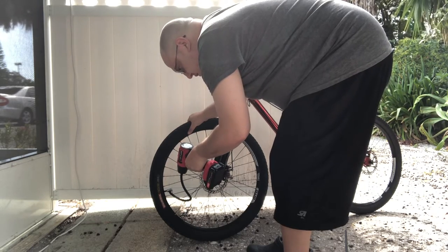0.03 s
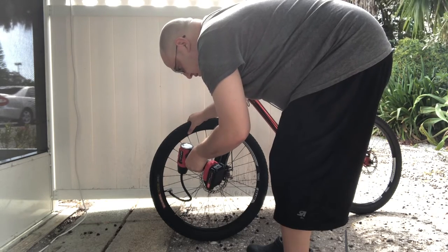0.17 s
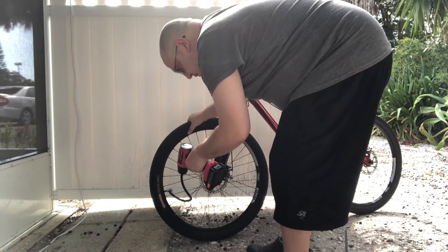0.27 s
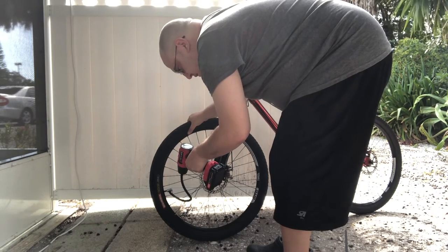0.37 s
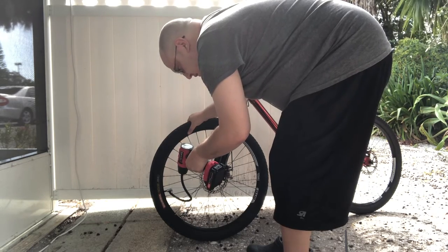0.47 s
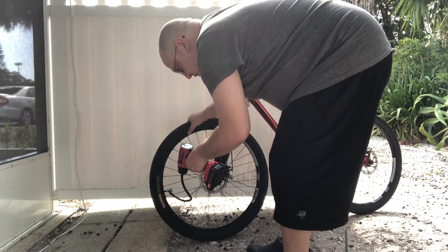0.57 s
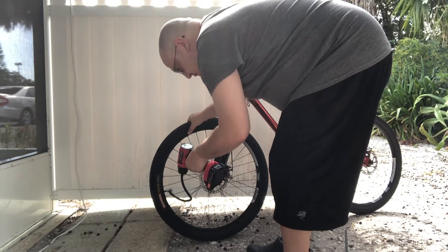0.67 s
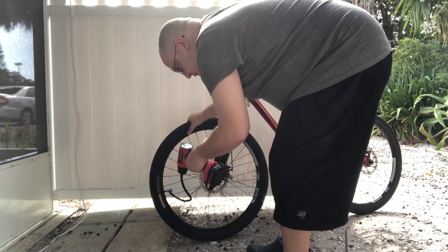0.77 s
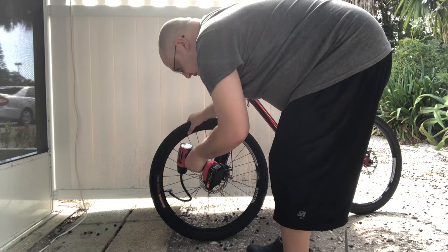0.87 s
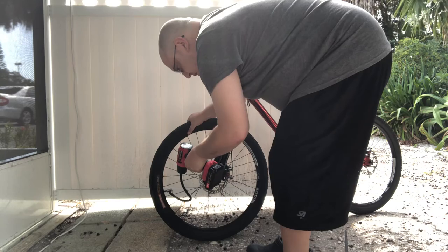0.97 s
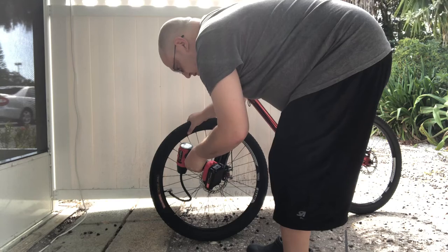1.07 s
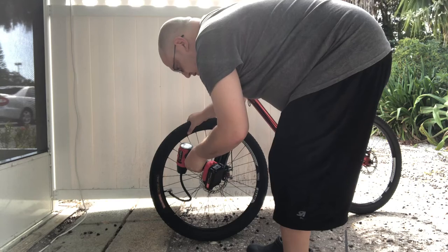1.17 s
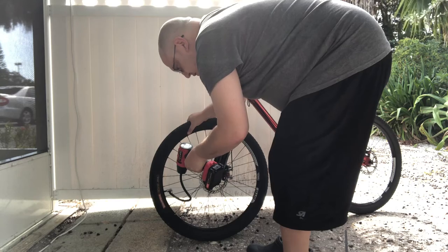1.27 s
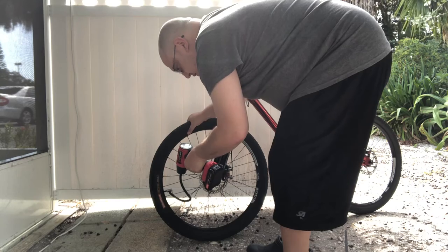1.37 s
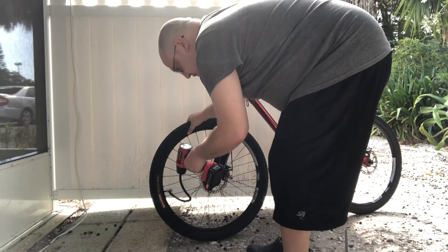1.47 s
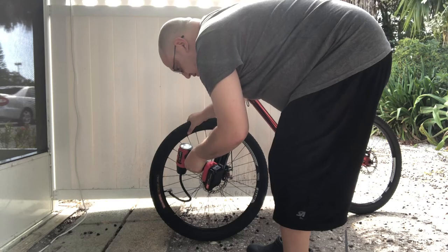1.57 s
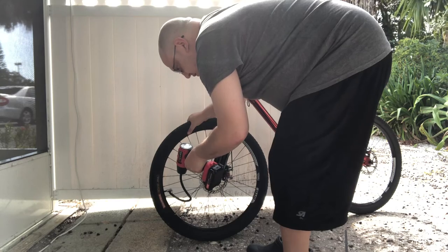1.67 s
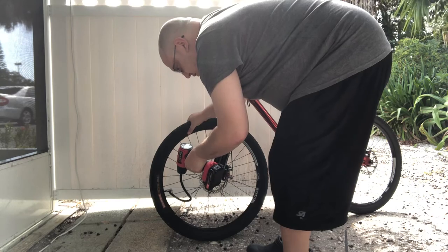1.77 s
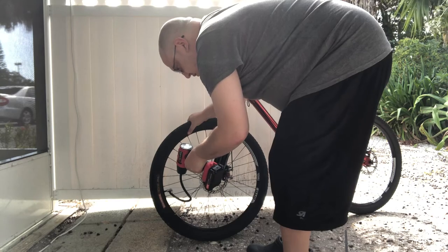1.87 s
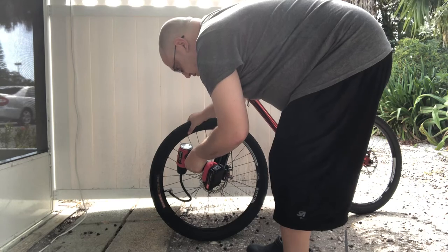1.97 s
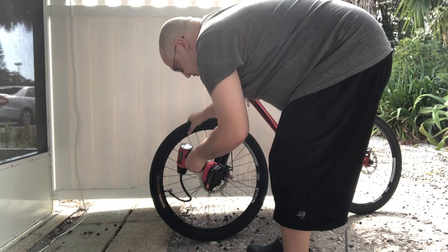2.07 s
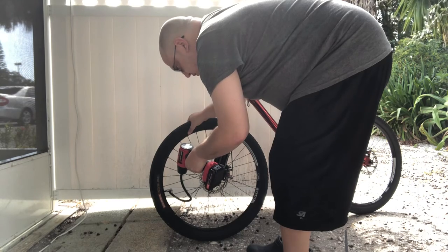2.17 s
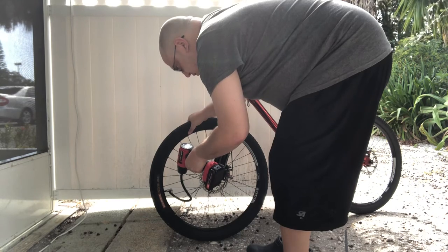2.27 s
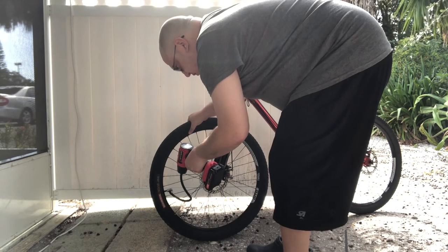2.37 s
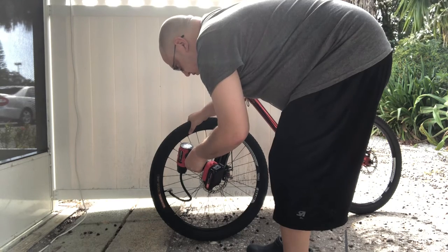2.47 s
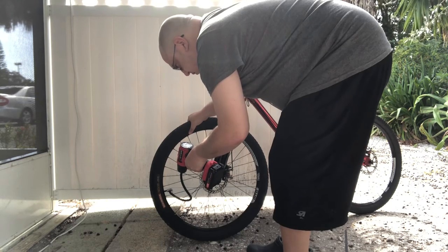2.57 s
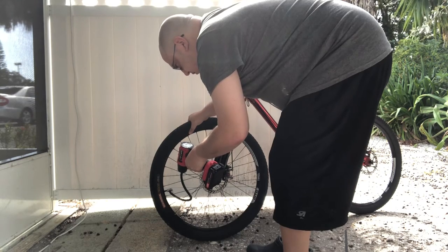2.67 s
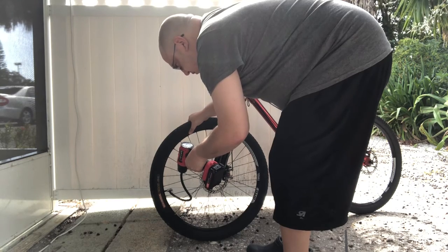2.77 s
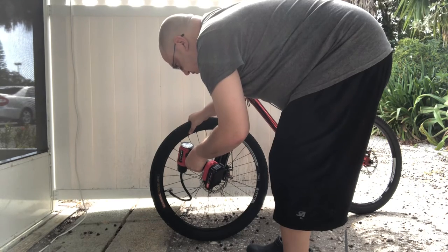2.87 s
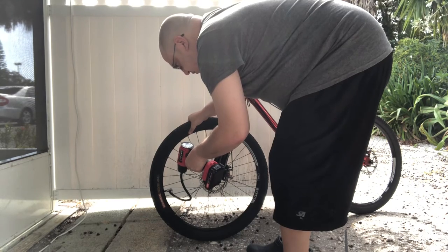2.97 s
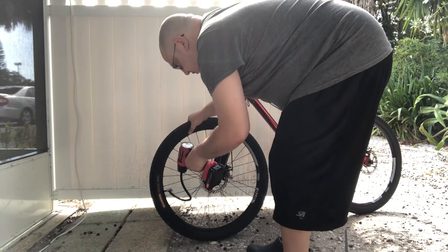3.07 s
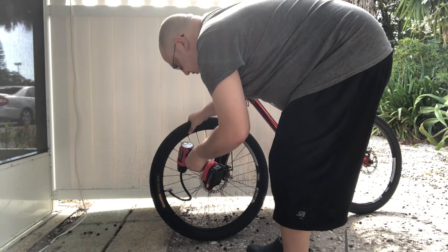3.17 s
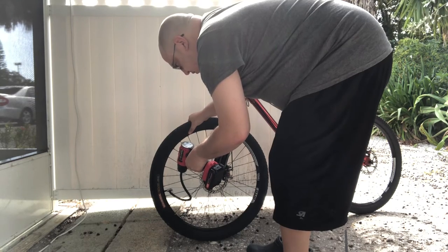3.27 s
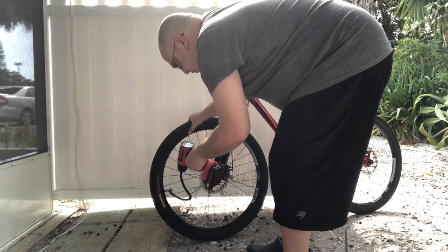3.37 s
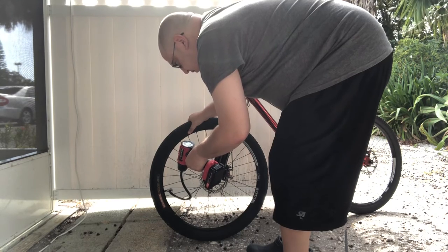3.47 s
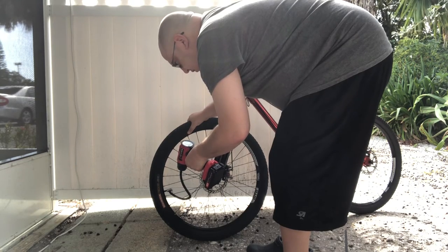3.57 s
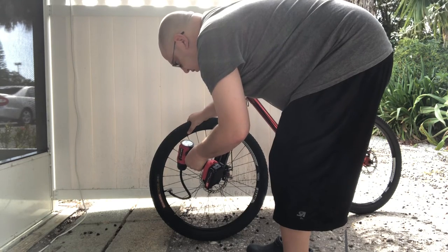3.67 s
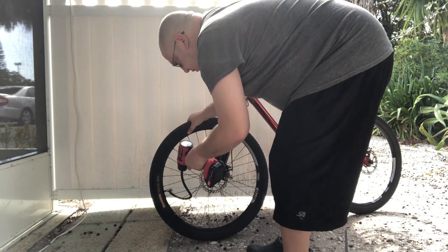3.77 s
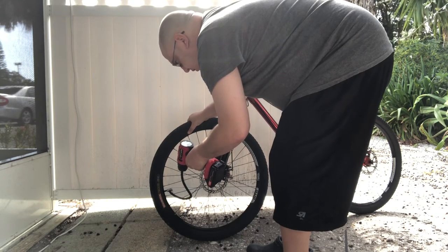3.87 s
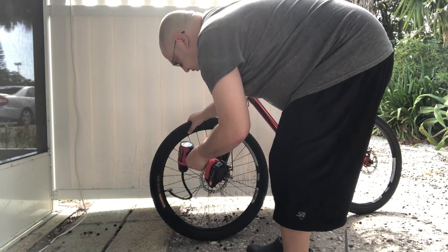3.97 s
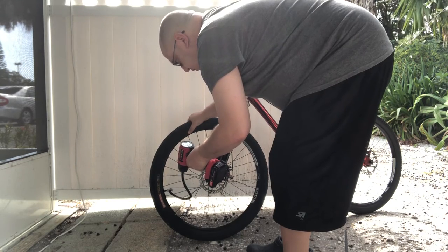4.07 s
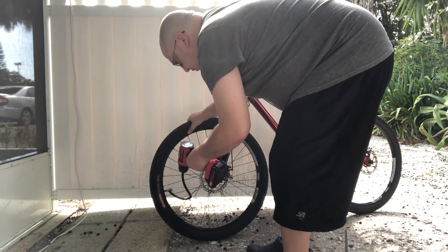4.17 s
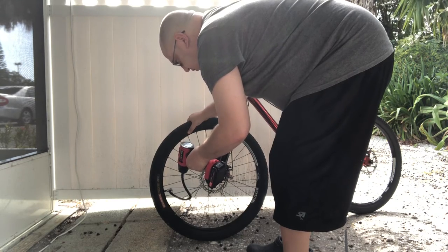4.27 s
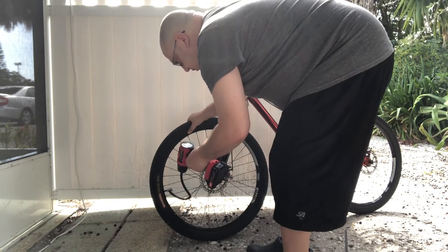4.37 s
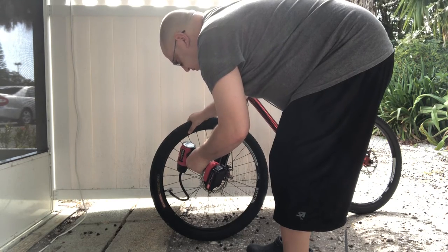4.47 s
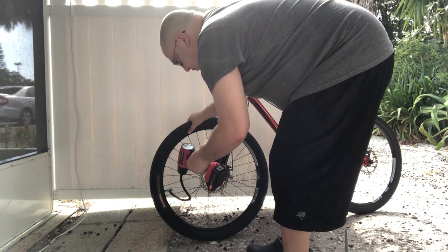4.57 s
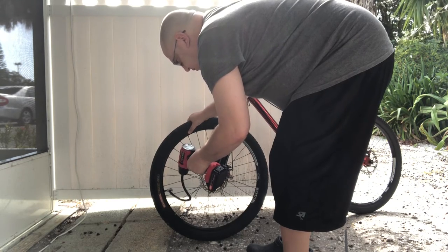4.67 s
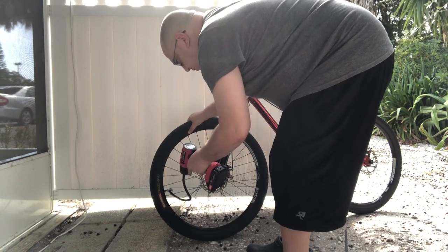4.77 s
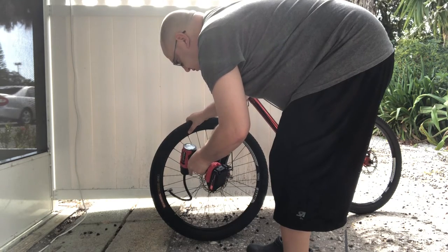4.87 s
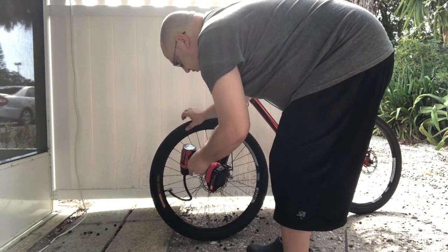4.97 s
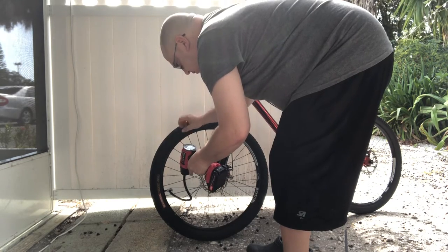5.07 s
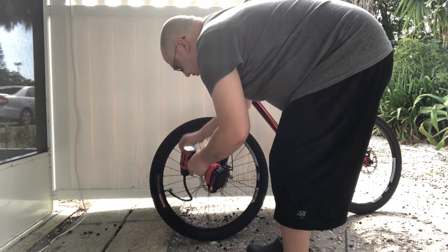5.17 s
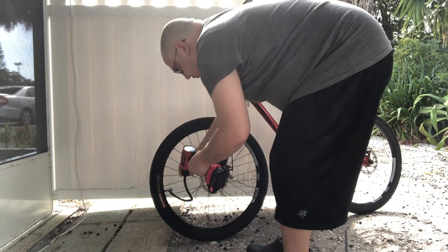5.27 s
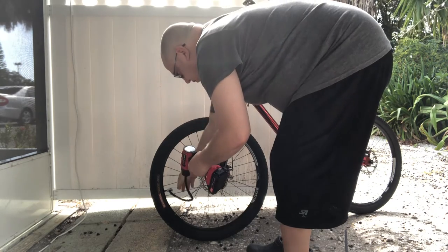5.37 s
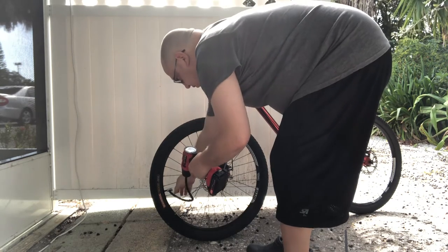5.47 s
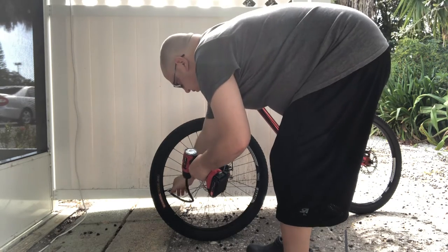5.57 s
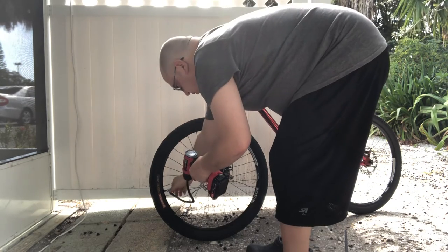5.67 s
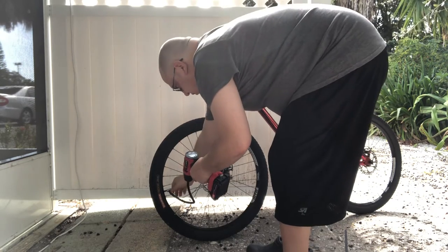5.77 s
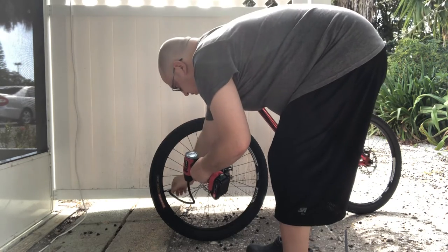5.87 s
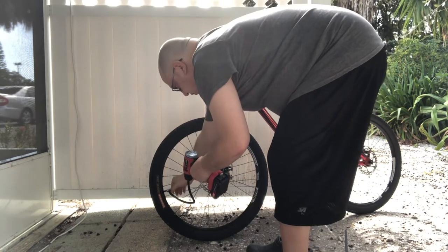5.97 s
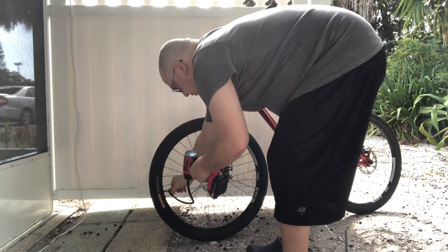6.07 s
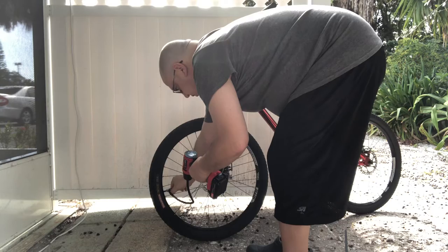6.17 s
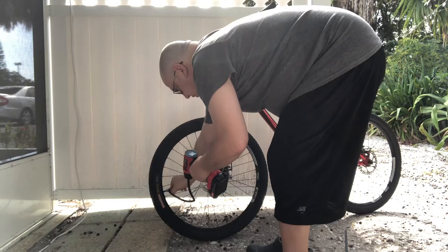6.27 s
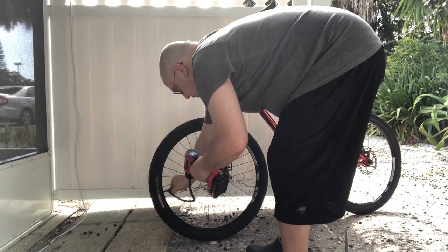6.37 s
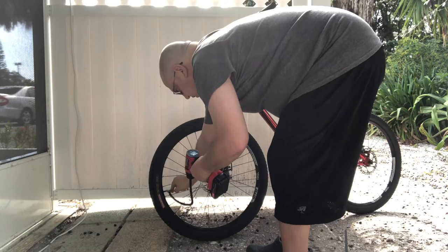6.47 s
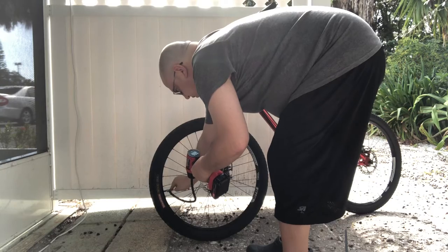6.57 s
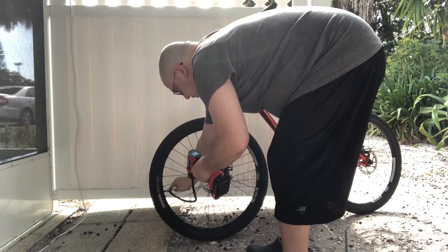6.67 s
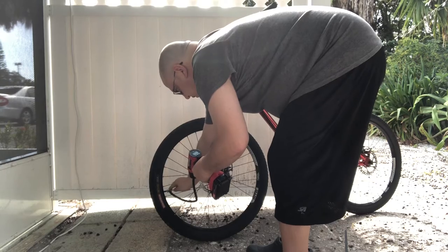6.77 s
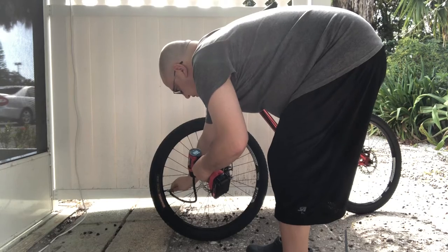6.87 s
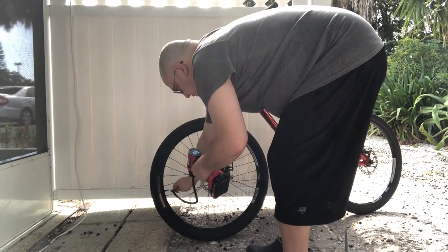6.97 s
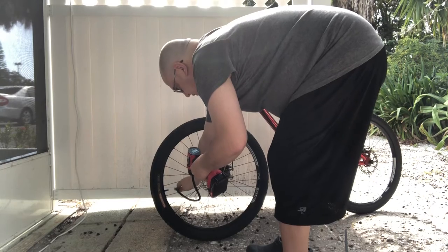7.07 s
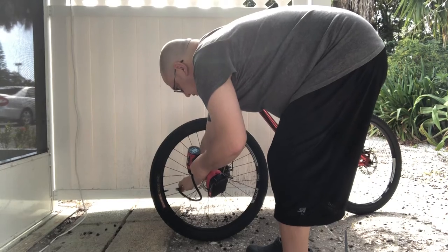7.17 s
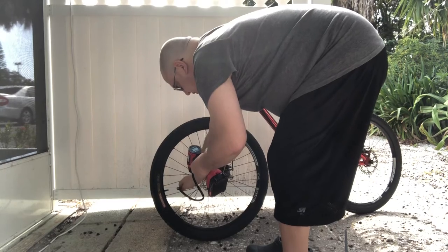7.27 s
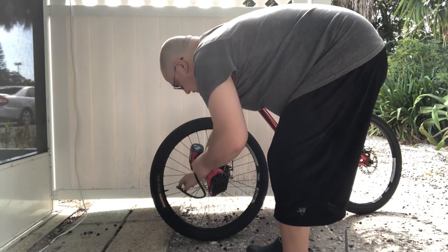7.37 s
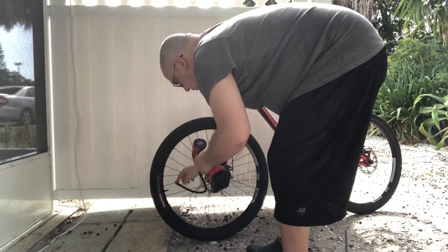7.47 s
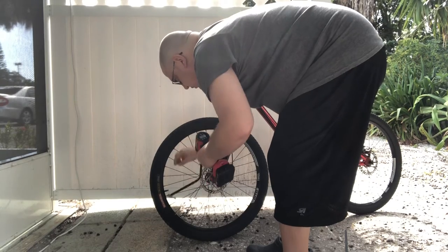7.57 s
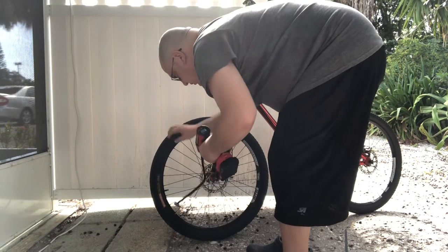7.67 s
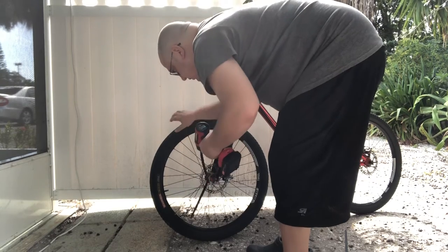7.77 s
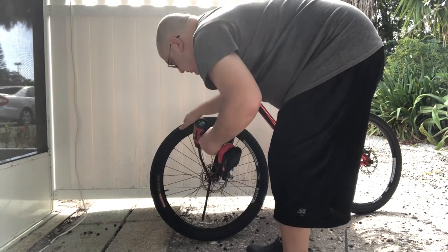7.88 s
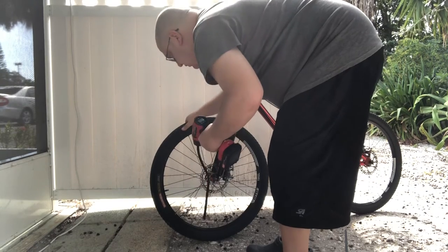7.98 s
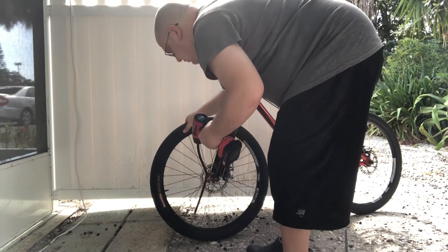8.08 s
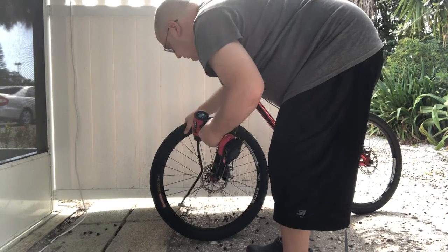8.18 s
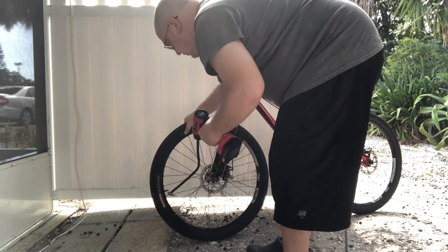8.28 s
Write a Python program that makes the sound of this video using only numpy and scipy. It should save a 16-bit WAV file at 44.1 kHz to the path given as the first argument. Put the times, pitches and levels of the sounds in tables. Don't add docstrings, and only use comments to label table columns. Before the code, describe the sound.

A small electric piston pump runs from the start, a fast buzzing clatter with gear grind and metallic ring. It turns harder and brighter as the tyre firms, then quickly coasts to a stop with light clicks. Over faint distant traffic, a short high hiss of air bursts with a squeal, then a lever clacks. Recorded by a phone about two metres away on a walled patio.

```python
import sys
import numpy as np
from scipy import signal
from scipy.fft import rfft, irfft, next_fast_len
from scipy.io import wavfile
from scipy.ndimage import uniform_filter1d

SR = 44100
rng = np.random.default_rng(int(sys.argv[2]) if len(sys.argv) > 2 else 0)


def undo_db(level):
    steps = np.asarray(level, float) / 20
    return 10 ** steps


def store_pcm(level_fs):
    pcm = np.round(np.clip(level_fs, -1, 1) * 32767).astype(np.int16)
    wavfile.write(sys.argv[1], SR, np.atleast_2d(pcm).T)


N = 367774

BODY_DB, FIRM_BODY_DB = -35, 0.58
FIRM_S, FIRM_RISE_S = 3.42, 0.12
OFF_S, FADE_LAG_S = 4.42, 0.012
BODY_FADE_DB_S, RATTLE_FADE_DB_S, GRIND_FADE_DB_S = 185, 250, 132


def pump():
    coasting_s = np.clip(clock() - OFF_S, 0, None)
    turns = crank(coasting_s)
    coasting_s = np.clip(coasting_s - FADE_LAG_S, 0, None)
    firm = .5 + .5 * np.tanh((clock() - FIRM_S) / FIRM_RISE_S)
    shaking = shakes(turns, KNOCKS, rest_db=-10, scatter_db=1.3)
    strokes = cylinder(turns, firm, coasting_s)
    gearing = undo_db(-GRIND_FADE_DB_S * coasting_s) * gear_train(turns, shaking, firm)
    light = reed(turns, firm) + rattle(turns, shaking, firm)
    light = patio(undo_db(-RATTLE_FADE_DB_S * coasting_s) * light)
    return undo_db(BODY_DB + FIRM_BODY_DB * firm) * (undo_db(-BODY_FADE_DB_S * coasting_s) * strokes + gearing + light)


CRANK_START = -.0888
TURN_HZ = 32.85
START_TURNS_S, SAG_TURNS_S2, BRAKE_TURNS_S2 = 33.02, .0834, 105


def crank(coasting_s):
    speed = START_TURNS_S - SAG_TURNS_S2 * clock() - BRAKE_TURNS_S2 * coasting_s
    return CRANK_START + np.cumsum(np.clip(speed, 0, None)) / SR


VALVE_DB, FIRM_VALVE_DB = -4.5, 1.5


def cylinder(turns, firm, coasting_s):
    thrum = stroke(turns, 0, 500, scatter_db=.8, wobble_s=3e-5, smear=.2)
    pop = stroke(turns, 500, 800, scatter_db=.9, wobble_s=2.5e-5, smear=.17)
    snap = stroke(turns, 800, 1150, scatter_db=1.3, wobble_s=2.5e-5, smear=.11)
    valve = stroke(turns, 1150, 1600, scatter_db=1.1, wobble_s=3e-5, smear=.1)
    valve_db = VALVE_DB + FIRM_VALVE_DB * firm - RATTLE_FADE_DB_S * coasting_s / 2
    return undo_db(-9.5) * thrum + undo_db(-5.5) * pop + undo_db(-3.0) * snap + undo_db(valve_db) * valve


# (pitch [Hz], width [Hz], level [dB])
STROKE = [(237, 19, -3), (330, 15, -5), (380, 54, -6), (465, 75, -11), (591, 81, -3), (736, 83, -2),
          (903, 42, 0), (974, 111, 0), (1085, 59, -9), (1230, 175, -4), (1419, 114, -6), (1564, 34, -3)]
# (pitch [Hz], place after the slap [turns])
STROKE_WHEN = [(200, 0.4462), (450, 0.338), (600, 0.282), (1000, 0.269), (1120, 0.0072), (1300, -0.139),
               (1450, -0.248), (1600, 0.18)]


def stroke(turns, lo_hz, hi_hz, scatter_db, wobble_s, smear):
    order = np.arange(1, 49)
    order_hz = order * TURN_HZ
    power = 0
    for hz, width, db in STROKE:
        power = power + (undo_db(db) / (1 + (2 * (order_hz - hz) / width) ** 2)) ** 2
    gain = np.sqrt(power)
    delay = np.cumsum(np.interp(order_hz, *np.transpose(STROKE_WHEN)))
    delay = delay + smear * rng.standard_normal(len(order))
    angle = np.arange(-SR // TURN_HZ, SR // TURN_HZ) * TURN_HZ / SR
    use = (order_hz >= lo_hz) & (order_hz < hi_hz)
    waves = np.cos(2 * np.pi * (order[use, None] * (angle + .15) - delay[use, None]))
    shape = gain[use] @ waves * np.hanning(len(angle))
    return level(signal.fftconvolve(ticks(turns, .15, scatter_db, wobble_s), shape, "same"), 0)


def ticks(turns, at, scatter_db, wobble_s):
    whole = np.arange(int(turns[-1] - at))
    late, size = rng.standard_normal((len(whole), 2)).T
    place = np.interp(whole + at, turns, np.arange(N)) + wobble_s * SR * late
    index = np.round(place).astype(int)[:, None] + np.arange(-8, 9)
    click = np.sinc(index - place[:, None]) * np.hanning(19)[1:-1]
    out = np.zeros(N)
    np.add.at(out, np.clip(index, 0, N - 1), undo_db(scatter_db * size)[:, None] * click)
    return out


REED_DB, FIRM_REED_DB = -6.5, 9
# (pitch [Hz], width [Hz], level [dB])
REED = [(2463, 110, 4.5), (1360, 120, -4), (3950, 114, -2.5), (5700, 320, -33)]


def reed(turns, firm):
    second = -.17 + 9 * TURN_HZ / 2440
    blows = ticks(turns, -.17, 2, 2e-5) + ticks(turns, second, 2, 2e-5)
    tones = 0
    for hz, width, db in REED:
        tones = tones + ring(ring(blows, [(hz, width, db)]), [(hz, 3.5 * width, 0)])
    return undo_db(REED_DB + FIRM_REED_DB * firm) * level(tones, -2.7)


# (time after the slap [turns], level [dB], decay [turns])
KNOCKS = [
    (-.24, -9, 0.051),
    (-.13, -3, 0.22),
    (-.02, -11, 0.15),
    (.14, -14.5, 0.084),
    (.3, -13, 0.11),
]


def shakes(turns, knocks, rest_db, scatter_db):
    out = undo_db(rest_db)
    for at, db, decay in knocks:
        size = undo_db(db + scatter_db * rng.standard_normal(200))
        since = turns - at
        out = out + size[np.floor(since).astype(int)] * np.exp(-(since % 1) / decay)
    return out


RATTLE_DB, FIRM_RATTLE_DB, FIRM_SHELL_DB = -0.7, -0.37, -2
# (pitch [Hz], level [dB per Hz])
RATTLE = [(820, -32), (1400, -3), (2000, -7), (3560, -5.5), (4270, -10), (5130, -12), (6090, -18),
          (6950, -18), (12300, -23.5), (14100, -40.5), (15800, -24)]
# (pitch [Hz], width [Hz], level [dB])
SHELL = [(1795, 98, 2), (2460, 1400, -3.5), (3500, 180, 2), (4000, 130, -5), (5110, 270, -2),
         (5650, 160, -10.5), (6950, 580, -1), (8070, 130, 3.5), (10430, 140, 4), (11380, 200, 3)]
# (pitch [Hz], width [Hz], level [dB])
FIRM_SHELL = [(4080, 67, -13), (5640, 150, -1), (1470, 170, -14)]
# (time after the slap [turns], level [dB], decay [turns])
BRUSH_KNOCKS = [
    (-.27, 0, .07),
    (-.05, -5, .1),
    (.29, 1, .11),
]
# (pitch [Hz], width [Hz], level [dB])
BRUSH = [(14130, 1100, 9), (14500, 1200, -16)]


def rattle(turns, shaking, firm):
    clatter = tooth_clatter(turns, uniform_filter1d(shaking, size=50), repeat=0.44, drift_hz=0.43)
    shake = colour(clatter, RATTLE)
    shell = shake + undo_db(FIRM_SHELL_DB * firm) * ring(shake, SHELL) + firm * ring(shake, FIRM_SHELL)
    sparking = shakes(turns, BRUSH_KNOCKS, rest_db=-3, scatter_db=1.5)
    brush = level(ring(sparking * rng.standard_normal(N), BRUSH), -10)
    return undo_db(RATTLE_DB + FIRM_RATTLE_DB * firm) * (level(shell, 2.02) + brush)


def tooth_clatter(turns, shaking, repeat, drift_hz):
    size = int(SR / TURN_HZ)
    worn = rng.standard_normal((2, size))[:, (turns % 1 * size).astype(int)]
    drift = np.cumsum(drift_hz * (1 + .5 * walk(1.97))) * 2 * np.pi / SR
    same = worn[0] * np.cos(drift) + worn[1] * np.sin(drift)
    teeth = np.sqrt(repeat) * same + np.sqrt(1 - repeat) * rng.standard_normal(N)
    return signal.sosfilt(signal.butter(4, 1550, "high", fs=SR, output="sos"), shaking * teeth)


FIRM_GRIND_DB, FIRM_MESH_DB = 3, -0.5
# (pitch [Hz], level [dB per Hz])
GRIND = [(160, -46), (280, -16), (329, -5), (505, -14), (589, -5), (728, -5), (818, -9), (967, -2),
         (1600, -9), (2080, -39), (3520, -120)]


def gear_train(turns, shaking, firm):
    even = np.sqrt(shaking)
    grind = level(colour(even * rng.standard_normal(N), GRIND), -10.5)
    case = mesh(turns, even, repeat=.45)
    return undo_db(FIRM_GRIND_DB * firm) * grind + undo_db(FIRM_MESH_DB * firm) * case


PINION_TEETH, WHEEL_TEETH, MESH_DB = 8, 39, -7
# (pitch [Hz], width [Hz], level [dB])
MESH = [(951, 147, 5.5), (635, 110, -5.5), (450, 220, -9)]
# (multiple of the shaft rate, level [dB], lurch once a crank turn [radians])
MOTOR = [(3, -22, 0.66), (6, -30.5, 0.61)]


def mesh(turns, shaking, repeat):
    size = int(SR / TURN_HZ)
    worn = rng.standard_normal(size * PINION_TEETH)[(turns % PINION_TEETH * size).astype(int)]
    teeth = np.sqrt(repeat) * worn + np.sqrt(1 - repeat) * rng.standard_normal(N)
    shaft = turns * WHEEL_TEETH / PINION_TEETH
    hum = 0
    for multiple, db, lurch in MOTOR:
        hum = hum + undo_db(db) * np.sin(2 * np.pi * multiple * shaft + lurch * np.cos(2 * np.pi * turns))
    return level(ring(ring(shaking * teeth, MESH), MESH), MESH_DB) + hum


PUFF_S, PUFF_DB, PUFF_ATTACK_S, PUFF_HOLD_S = 6.427, -41.5, 0.0046, 0.027
LEAK_S, LEAK_DB = .012, -22
GUSH_T60_S, SEEP_DB, SEEP_T60_S = .06, -4, .36
LOW_HISS_LAG_S, LOW_HISS_DB, LOW_SEEP_DB = 0.0072, -3.5, -5.5
# (pitch [Hz], level [dB per Hz])
PUFF_COLOUR = [(3820, -43), (6500, -16), (8840, -8), (9730, -8), (10400, -4), (11600, -3), (12900, -1),
               (15100, 0), (15600, -7)]
# (time [s], pitch [Hz], level [dB], hold [s], time to fade by 60 dB [s])
SQUEALS = [
    (6.441, 10630, -37.5, .008, .04),
    (6.452, 10860, -60, .005, .22),
    (7.6, 11330, -78, .04, .12),
]
# (distance off pitch [Hz], settling time [s])
SQUEAL_GLIDES = [
    (1199, 0.0029),
    (30, .01),
    (-200, .02),
]


def chuck():
    spit = undo_db(1.8 * walk(400))
    leak = undo_db(LEAK_DB) * swell(PUFF_S - LEAK_S, LEAK_S, 0, GUSH_T60_S)
    high = level(colour(rng.standard_normal(N), [(4000, -35)] + list(PUFF_COLOUR)), -1.5)
    high = high * (gush(PUFF_S, PUFF_HOLD_S, SEEP_DB) + leak)
    low = level(ring(rng.standard_normal(N), [(3260, 2400, 0), (5270, 2900, -2)]), LOW_HISS_DB)
    low = low * gush(PUFF_S + LOW_HISS_LAG_S, 0, LOW_SEEP_DB)
    squeals = sum(whistle(row, glide, rough=.4) for row, glide in zip(SQUEALS, SQUEAL_GLIDES))
    return spit * undo_db(PUFF_DB) * (high + low) + squeals


def gush(start_s, hold_s, seep_db):
    fast = swell(start_s, PUFF_ATTACK_S, hold_s, GUSH_T60_S)
    slow = swell(start_s, PUFF_ATTACK_S, hold_s, SEEP_T60_S)
    return fast * (1 - undo_db(seep_db)) + slow * undo_db(seep_db)


def whistle(row, glide, rough):
    at, hz, db, hold_s, t60 = row
    off_hz, settle_s = glide
    pitch = hz + off_hz * np.exp(-np.clip(clock() - at, 0, None) / settle_s)
    tone = np.sin(2 * np.pi * np.cumsum(pitch * (1 + .02 * rough * walk(500))) / SR)
    return np.sqrt(2) * undo_db(db + 6 * rough * walk(300)) * swell(at, hold_s / 6, hold_s, t60) * tone


# (time [s], peak level [dB], pitch [Hz], time to fade by 60 dB [s])
TAPS = [(1.941, -25, 131, 0.059), (4.573, -50, 2810, .031), (4.59, -38, 990, .036),
        (4.626, -50, 1610, .031), (6.003, -53, 1090, .027), (6.4281, -47, 13600, .016),
        (6.4291, -39, 9300, .016), (6.4327, -36, 10300, .016), (6.4342, -40.5, 3500, .04),
        (6.4345, -39, 5200, 0.026), (6.9751, -49, 3200, .031), (6.9981, -39, 2430, .035),
        (7.0016, -49, 3610, .021), (7.0033, -41.5, 2590, .041), (7.0051, -52, 1570, 0.13),
        (7.0132, -52, 2720, .13), (4.532, -41, 495, 0.049), (4.493, -36, 640, .035)]


def clacks():
    out, s = np.zeros(N), np.arange(SR // 5) / SR
    for at, db, hz, t60 in TAPS:
        noise = ring(3.4 * rng.standard_normal(len(s)), [(hz, hz / 4, 0)])
        blow = np.sin(2 * np.pi * hz * s) + 0.81 * noise
        fade = np.minimum(s * hz / 1.5, 1) * np.exp(-np.log(1000) * s / t60)
        out[int(at * SR):][:len(s)] += undo_db(db) * blow * fade
    return out


def patio(x):
    tail = rng.standard_normal(SR // 4) * np.exp(-np.log(1000) * np.arange(SR // 4) / SR / .2)
    return x + undo_db(-40) * signal.fftconvolve(x, np.r_[np.zeros(300), tail])[:N]


TOWN_DB = -50
# (pitch [Hz], level [dB per Hz])
TOWN = [(22, -36), (40, -18), (64, -3), (120, -1), (163, -7.5), (199, -4.5), (245, -6.5), (400, -11),
        (680, -15), (1030, -13.5), (2040, -20.5), (7700, -29.5), (8300, -36), (15600, -40)]
# (time [s], level [dB], length [s])
PASSES = [
    (.15, 2, .3),
    (1.5, 2.5, 0.16),
    (3.9, 6.5, 3.8),
]


def town():
    size = 2 * next_fast_len(N // 2 + 1)
    f = np.maximum(np.arange(size // 2 + 1) * SR / size, 1)
    hz, db = np.transpose(TOWN)
    spectrum = rfft(rng.standard_normal(size)) * undo_db(np.interp(np.log(f), np.log(hz), db))
    engines_db = -2.8
    for at, db, length_s in PASSES:
        engines_db = engines_db + db * np.exp(-((clock() - at) / length_s) ** 2)
    out, shared = 0, walk(1.0)
    for octave in np.arange(4, 14.6, .5):
        band = np.clip(1 - 2 * abs(np.log2(f) - octave), 0, 1)
        restless = np.clip((13 - octave) / 6, .2, 1)
        band_db = restless * (0.66 * shared + 1.15 * walk(1.7)) + (5 < octave < 7) * engines_db
        out = out + undo_db(band_db) * irfft(spectrum * band)[:N]
    machine = ring(ring(rng.standard_normal(N), [(168.2, 3.2, 0)]), [(164.0, 15, 0)])
    return level(out, TOWN_DB) + level(machine, -64)


def clock():
    return np.arange(N) / SR


def level(x, db, end=4.4):
    return x * undo_db(db) / np.sqrt(np.mean(x[:int(end * SR)] ** 2))


def swell(start_s, attack_s, hold_s, t60):
    s = clock() - start_s
    return np.clip(s / attack_s, 0, 1) * undo_db(-60 * np.clip(s - attack_s - hold_s, 0, None) / t60)


def walk(rate):
    k = int(SR / rate)
    steps = np.repeat(rng.standard_normal(N // k + 1), k)
    return 1.33 * uniform_filter1d(uniform_filter1d(steps, k), k)[:N]


def ring(x, modes):
    return sum(undo_db(db) * signal.lfilter(*signal.iirpeak(hz, hz / width, SR), x) for hz, width, db in modes)


def colour(x, points):
    hz, db = np.transpose(points)
    f = np.maximum(np.arange(1025) * SR / 2048, 1)
    cep = irfft(np.interp(np.log(f), np.log(hz), db) * np.log(10) / 20)
    cep[1:1024] *= 2
    cep[1025:] = 0
    return signal.fftconvolve(x, irfft(np.exp(rfft(cep))))[:N]


def scene():
    return (pump() + patio(chuck() + clacks()) + town())[None]


def band_limit(x):
    return signal.sosfilt(signal.butter(12, 16890, fs=SR, output="sos"), x)


TOP_HZ = 15730


def record(dry):
    mix = irfft(rfft(dry) * (np.arange(N // 2 + 1) * SR / N < TOP_HZ), N)
    return band_limit(mix)


dry = scene()
out = record(dry)
store_pcm(out)
```